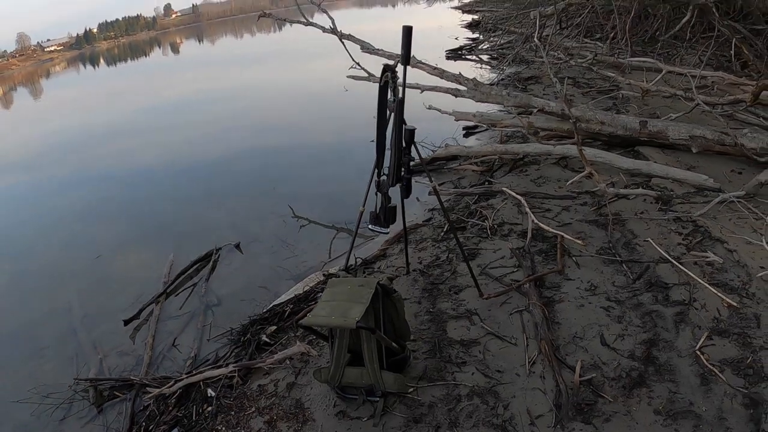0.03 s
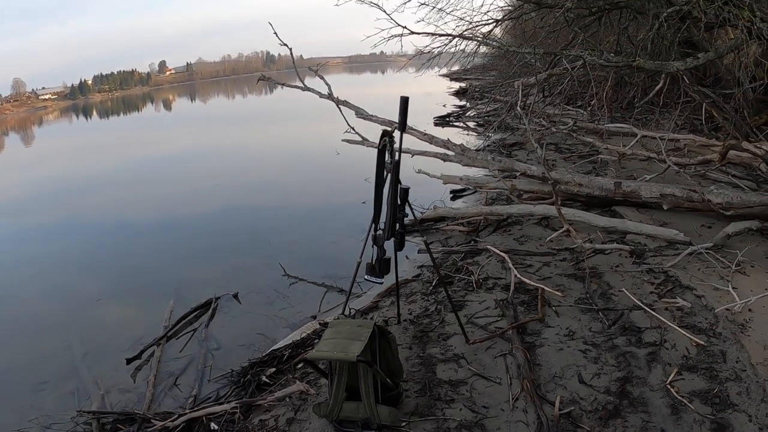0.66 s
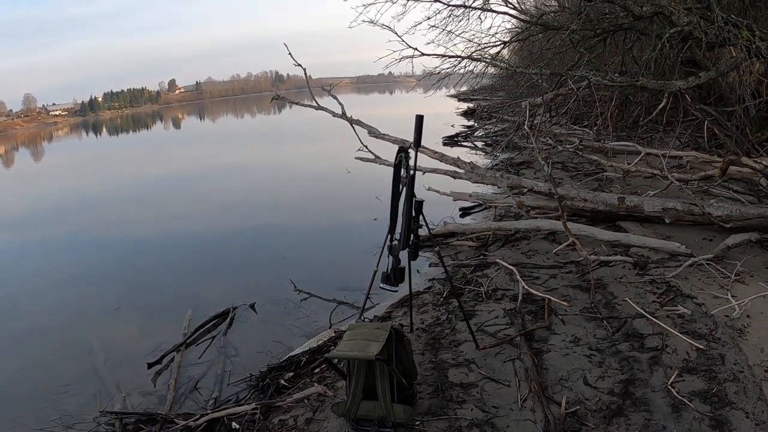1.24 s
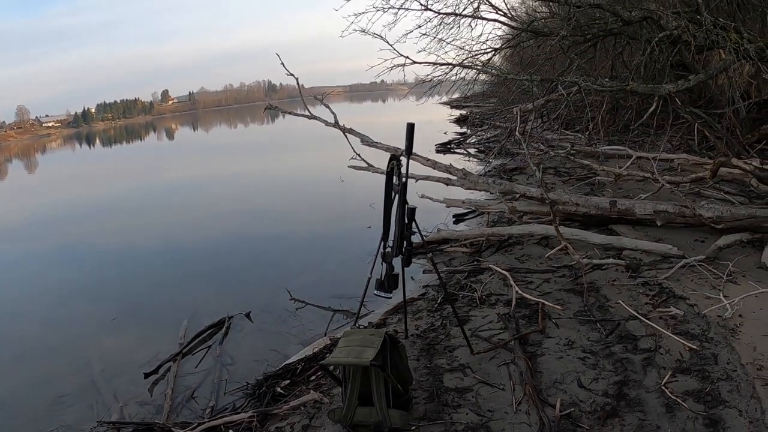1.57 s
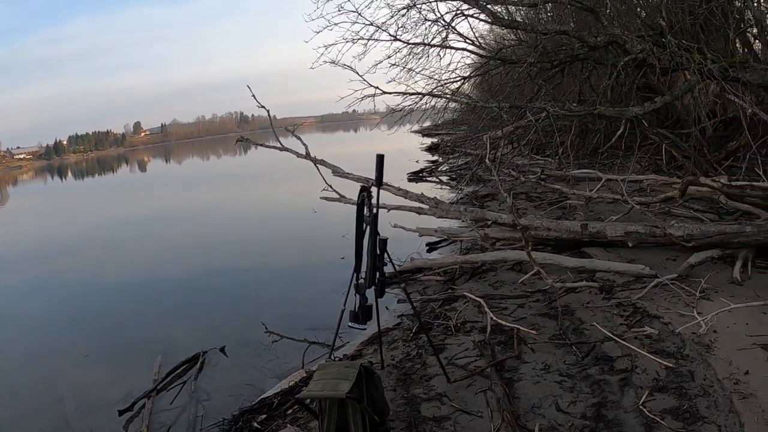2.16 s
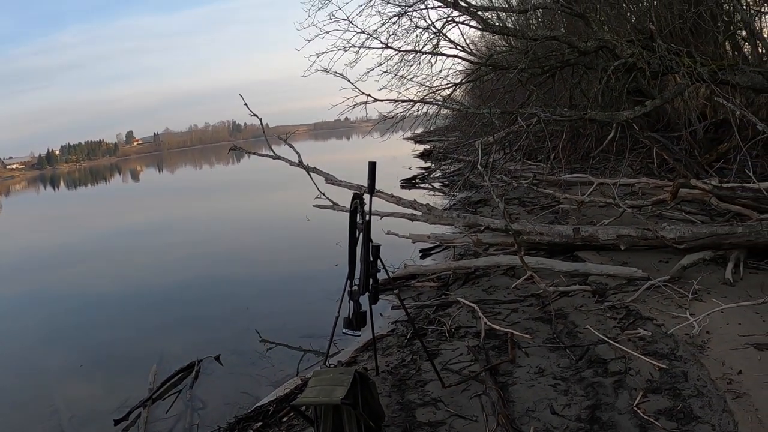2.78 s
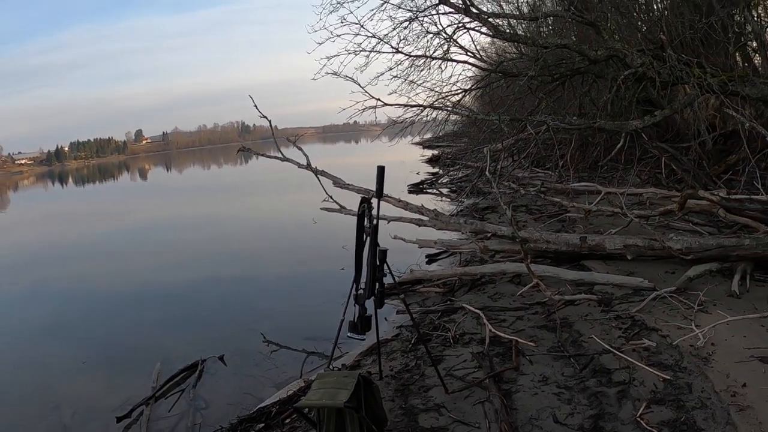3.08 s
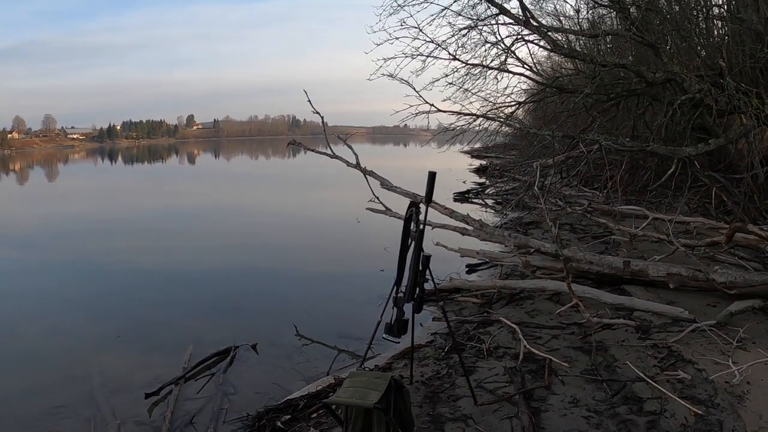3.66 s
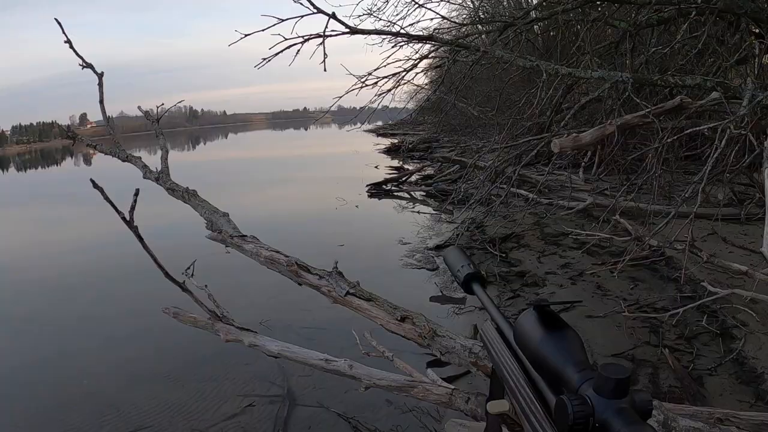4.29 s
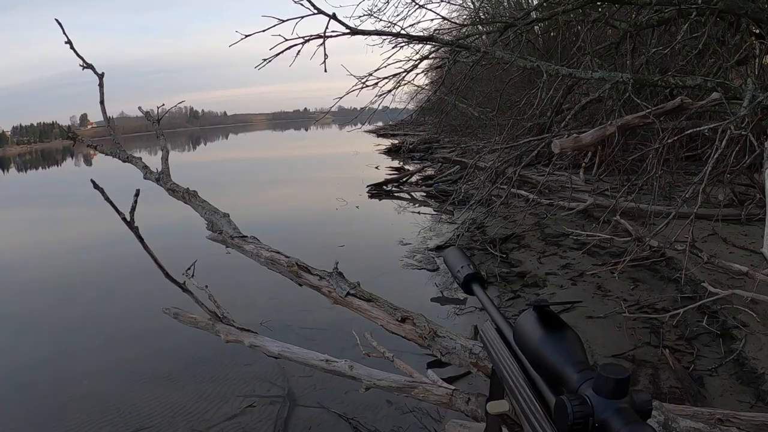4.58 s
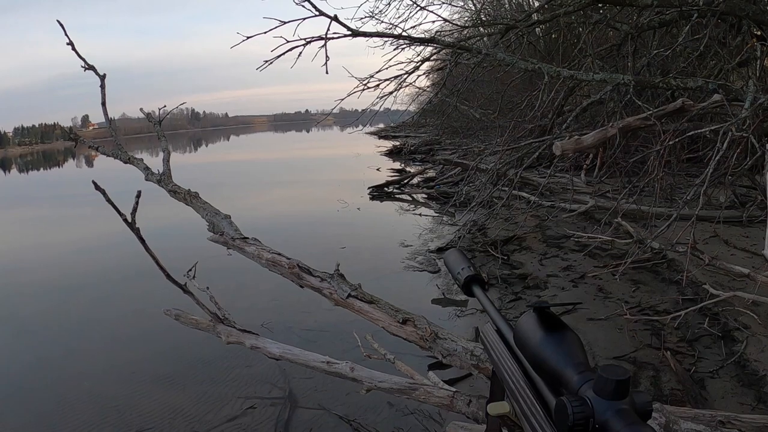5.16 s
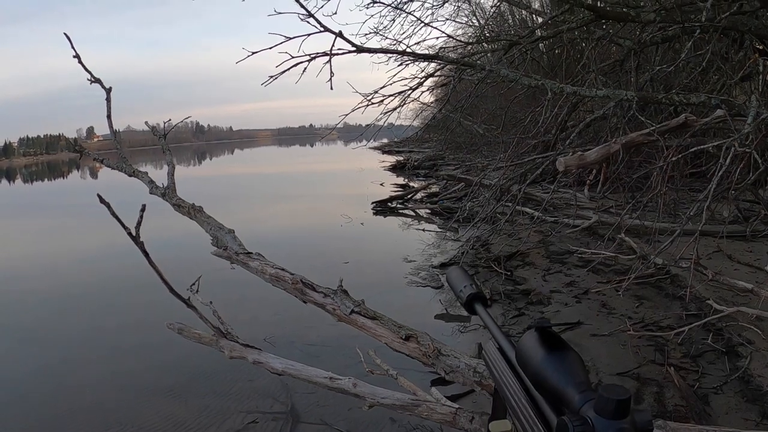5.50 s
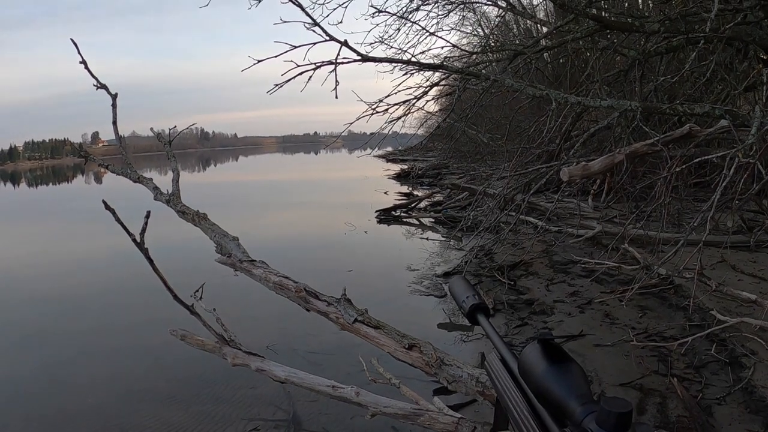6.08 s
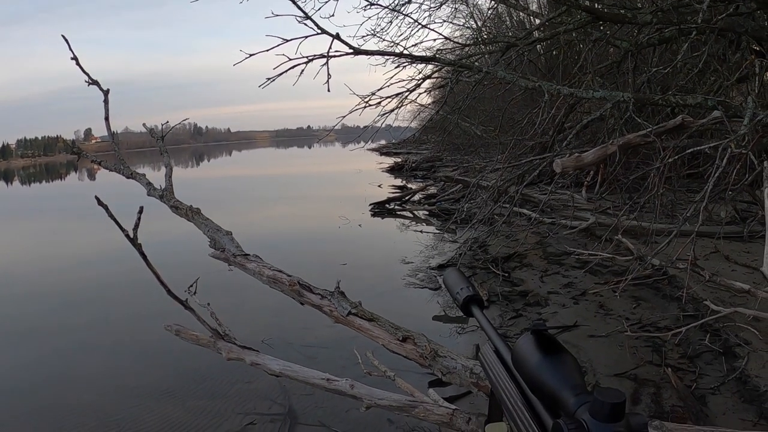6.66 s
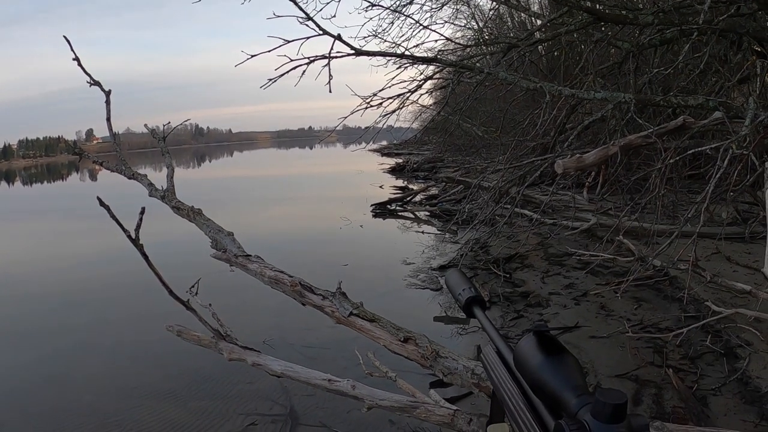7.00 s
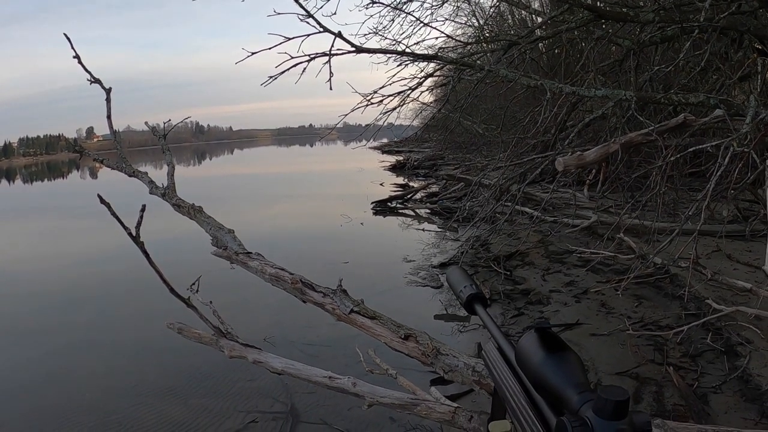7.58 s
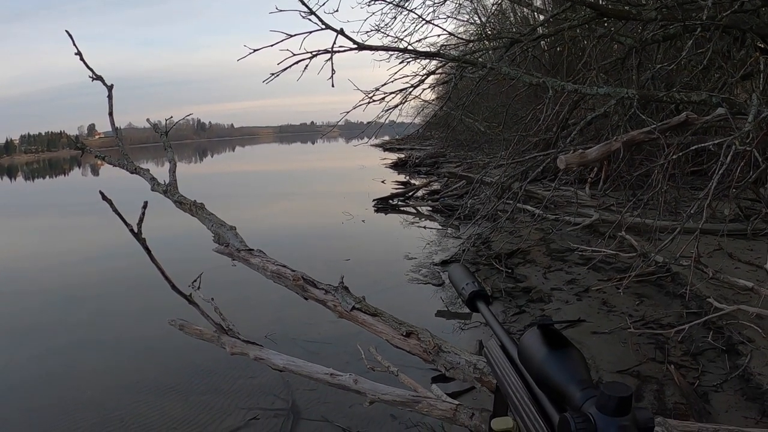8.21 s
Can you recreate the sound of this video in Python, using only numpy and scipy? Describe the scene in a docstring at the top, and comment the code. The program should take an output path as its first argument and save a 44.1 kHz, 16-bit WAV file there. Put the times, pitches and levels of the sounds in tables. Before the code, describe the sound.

Beside still water, a crow caws harshly every second or few, and each call rings on in the woods. Underneath, wind thumps the microphone briefly, then settles into a low rumble that slowly eases. Scattered little twig snaps sound close by. Between the caws come faint rising whistles and high buzzy notes from two distant small birds, with a dull outdoor murmur behind it all.

```python
"""A crow caws over the low rumble of wind on the microphone, by a still river bank.
Quick snaps of its voice box ring its throat and beak, and each rasping call echoes on in the woods.
A dull murmur and a faint hiss lie underneath; twigs tick nearby and the wind gives a few bumps.
Two small songbirds answer far off, one with rising whistles, one with thin buzzy notes."""
import sys
import numpy as np
from scipy import signal
from scipy.fft import rfft, irfft
from scipy.io import wavfile
from scipy.ndimage import uniform_filter1d

SR = 44100
rng = np.random.default_rng(int(sys.argv[2]) if len(sys.argv) > 2 else 0)


def store_pcm(level_fs):
    """Save levels as 16-bit WAV."""
    pcm = np.round(np.clip(level_fs, -1, 1) * 32767).astype(np.int16)
    wavfile.write(sys.argv[1], SR, np.atleast_2d(pcm).T)


N = 367794
T = np.arange(N) / SR


def undb(db):
    """Turn decibels into a gain."""
    return 10 ** (np.asarray(db) / 20)


def unit(x):
    """Scale to an average power of 1."""
    return x / np.sqrt(np.mean(x ** 2))


def at_hz(points, hz):
    """Read between (Hz, value) points on a log-frequency axis."""
    f, value = np.transpose(points)
    return np.interp(np.log(np.maximum(hz, 1)), np.log(f), value)


def colour(x, points):
    """Filter by a (Hz, dB) curve."""
    n = x.shape[-1]
    return irfft(rfft(x) * undb(at_hz(points, np.fft.rfftfreq(n, 1 / SR))), n)


def resonate(x, hz, width_hz, db):
    """Make x ring at one pitch; filtering twice gives the peak steep sides."""
    b, a = signal.iirpeak(hz, hz / (1.114 * width_hz), SR)
    return undb(db) * signal.lfilter(b, a, signal.lfilter(b, a, x))


def add(out, x, start):
    """Mix x into out at a start time in seconds."""
    i = int(start * SR)
    x = x[..., max(-i, 0):N - i]
    out[..., max(i, 0):max(i, 0) + x.shape[-1]] += x


def stereo_noise(points, side_db):
    """Noise shaped by a (Hz, dB) curve; more side_db makes it wider."""
    mid, side = colour(rng.standard_normal((2, N)), points) * np.sqrt(SR / 2)
    return mid + undb(side_db) * side * np.array([[1], [-1]])


def wander(per_second):
    """A smooth random curve of size about 1."""
    hold = int(SR / per_second)
    steps = rng.standard_normal(SR // 100)[np.arange(N) // hold]
    return unit(uniform_filter1d(uniform_filter1d(steps, hold), hold))


def caw(length, throat_hz, beak_hz, harsh_db, chest_db):
    """The voice box snaps about sixty times a second; each snap rings the throat and puffs air."""
    # Resonances. Each row: pitch in Hz, width in Hz, gain in dB.
    chest = (495, 85, 0)
    sharp_edge = (2410, 460, -22.5)
    overtones = [(1065, 47, -12.5), (1200, 33, -18), (1460, 80, -22), (1700, 140, -12)]
    hoarse_breath = [(1126, 380, -2.5), (1392, 205, -13.5), (2380, 2300, -30)]
    # Treble lost on the long way through the air. Each row: frequency in Hz, gain in dB.
    air_loss = [(1500, 3.5), (2100, -1), (3000, -4.5), (4200, -1.5), (7000, -35)]
    rasp_hz, arch, jitter, puff_s = 64.18, 0.07997, 0.0076, 0.0092
    t = T[:SR // 3]
    progress = np.clip(t / length, 0, 1)
    # Effort swells slowly and drops quickly; the snap rate rises and falls with it.
    effort = np.maximum(np.sin(np.pi * progress ** 1.2), 0) ** .85
    cycles = np.cumsum(rasp_hz * (1 - arch * (2 * progress - 1.15) ** 2 + arch / 20)) / SR
    snap_at = np.flatnonzero(np.diff(np.floor(cycles)))
    early, size_db = rng.standard_normal((SR // 1000, 2))[:len(snap_at)].T
    snap_at -= (jitter * SR / rasp_hz * early).astype(int)
    snaps = np.zeros(len(t))
    snaps[np.clip(snap_at, 0, len(t) - 1)] = undb(size_db)
    since_snap = (cycles % 1) / rasp_hz
    puffs = np.exp(-since_snap / puff_s) * rng.standard_normal(len(t)) / np.sqrt(SR * puff_s / 2)
    # A harsher caw lifts the sharp edge and the beak over the throat.
    posture = [(*chest[:2], chest[2] + chest_db), (throat_hz, 144, 0),
               (*sharp_edge[:2], sharp_edge[2] + harsh_db)]
    voice = sum(resonate(effort * snaps, *ring) for ring in posture + list(overtones))
    beak_opening = undb(9.5 * (.5 - progress))  # the beak closes, so its ring fades
    voice += resonate(beak_opening * effort * snaps, beak_hz, width_hz=134, db=harsh_db - 3)
    voice += sum(resonate(effort * puffs, *ring) for ring in hoarse_breath)
    return unit(colour(voice, air_loss)) * np.sqrt(length / t[-1])


def crow():
    """Six caws ring through the trees; the row at 5.27 s is the soft, throaty echo of the fifth."""
    # Each row: start and length in seconds, level in dB, throat and beak pitch in Hz,
    # then harshness, chest and woods echo in relative dB.
    caws_and_echo = [(-.14, .22, -39, 1084, 1480, -3, -5, -0.5),
                     (1.226, .195, -35.5, 1075, 1305, 2, -2, -2),
                     (2.778, 0.1913, -35.5, 1056, 1324, -1.5, -4.5, -4.5),
                     (4.25, .15, -37, 1034, 1350, 1.5, 1, -2.5), (5.155, 0.183, -40, 985, 1434, 7, 1.5, -6),
                     (5.27, .26, -42.5, 1052, 1440, -19, -10, -7.5),
                     (7.849, 0.17, -45, 1007, 1376, 0.5, 2, 2)]
    out = np.zeros((2, N))
    for start, length, db, *voice, echo_db in caws_and_echo:
        sound = undb(db) * caw(length, *voice)
        add(out, outdoors(sound, direct_db=-3, echo_db=echo_db + 2, scatter_s=0.016), start)
    return out


def woods_echo(build_s=0.0032):
    """Countless trunks send sound back: it builds up, then each band dies at its own rate."""
    # The echo's tone. Each row: frequency in Hz, gain in dB.
    echo_tone = [(300, -3), (500, -4), (750, 1.5), (1050, 2.5), (1400, -1.5), (2000, 7), (3000, 5.5),
                 (5000, 0)]
    # Each row: frequency in Hz, seconds the echo takes to fade by 60 dB.
    fade_times = [(300, 2.8), (600, 3.8), (1050, 2.99), (1500, 3.27), (3000, 2.3), (5000, 1.5)]
    t = T[:int(2.5 * SR)]
    hz = np.fft.rfftfreq(len(t), 1 / SR)
    noise = rfft(rng.standard_normal((2, len(t))))
    band_hz, fades_s = np.transpose(fade_times)
    tail = 0
    for share, fade_s in zip(np.eye(len(band_hz)), fades_s):
        band = at_hz(np.c_[band_hz, share], hz)
        tail += irfft(noise * band, len(t)) * np.exp(-np.log(1000) * t / fade_s)
    return colour(tail, echo_tone) * (1 - np.exp(-t / build_s)) / np.sqrt(SR / 10)


def outdoors(x, direct_db, echo_db, scatter_s):
    """A call arrives directly, scattered by branches round the bird, and as a long echo."""
    # What thin branches scatter. Each row: frequency in Hz, gain in dB.
    branch_tone = [(450, 5), (1000, -2.5), (1600, -1), (4000, 1.5)]
    response = undb(echo_db) * woods_echo()
    t = T[:response.shape[1]]
    branches = colour(rng.standard_normal(response.shape), branch_tone)
    response += branches * np.exp(-t / scatter_s) / np.sqrt(SR * scatter_s / 2)
    response[:, 0] += undb(direct_db)
    return signal.fftconvolve(x[None], response, axes=1) / np.sqrt(1 + undb(2 * direct_db))


def wind(start_db=-33.5, ease_db_per_s=0.51, flutter_db=2.5):
    """Swirls of air rumble on the microphone and slowly ease; a few bump its left side harder."""
    # The rumble's tone. Each row: frequency in Hz, relative level in dB.
    rumble_tone = [(8, -38.5), (18, -12.5), (26, -11), (36, -14.5), (52, -25), (70, -21), (100, -31),
                   (130, -40.5), (170, -45.5), (300, -59.5), (800, -96)]
    # Each row: time in seconds, pitch in Hz, width in seconds, peak on the left in dB.
    bumps = [(0.246, 32, 0.022, -15.5), (0.266, 93, 0.0028, -9), (0.322, 59, 0.0039, -10.5)]
    out = stereo_noise(rumble_tone, side_db=-5)
    level_db = start_db - ease_db_per_s * T + flutter_db * wander(per_second=4.3)
    out *= undb(level_db + np.array([[.5], [-.5]]))
    for time, hz, width_s, db in bumps:
        from_peak = np.minimum(np.abs(T - time) / width_s * 2, 20)
        bump = np.cos(2 * np.pi * hz * (T - time)) / np.cosh(from_peak)
        out += undb(db + np.array([[0], [-13]])) * bump
    return out


def background():
    """The far landscape murmurs and the microphone hisses; both slowly fade."""
    # Their tones. Each row: frequency in Hz, relative level in dB.
    murmur_tone = [(60, -59), (170, -76.5), (260, -77.5), (400, -81), (600, -86), (1000, -92), (1800, -105),
                   (3500, -114), (8000, -130)]
    hiss_tone = [(200, -108), (2500, -106), (5000, -106), (8000, -106), (12000, -104.5), (15500, -102)]
    murmur = stereo_noise(murmur_tone, side_db=-7) * undb(5.5 - 0.52 * T)
    hiss = stereo_noise(hiss_tone, side_db=0.5) * undb(0.68 - 0.35 * T)
    return murmur + hiss


def twigs(rise_s=0.0003, decay_s=0.0071, rustle_db=-14, rustle_s=0.27):
    """Small dry snaps, each with a woody ring and a short rustle after it."""
    # Each row: start in seconds, relative peak in dB, gain of the low woody body in dB.
    ticks = [(.157, -39.5, 3), (1.1112, -43, 22), (1.2625, -34, 25), (2.5631, -41.5, -5), (4.176, -41, 17),
             (4.848, -40.5, 23), (5.011, -48.5, 11), (5.883, -43, 25), (6.3047, -52, 17), (6.6268, -54, 4),
             (7.414, -49.5, 16), (7.76, -49, 4)]
    # A snap's tone. Each row: frequency in Hz, gain in dB.
    snap_tone = [(400, -41), (1000, -11), (1700, 14.5), (2700, 7), (4000, -1.5), (7000, -20), (14000, -40)]
    out, t = np.zeros((2, N)), T[:SR // 4]
    shape = (1 - np.exp(-t / rise_s)) * (np.exp(-t / decay_s) + undb(rustle_db) * np.exp(-t / rustle_s))
    for start, db, body_db in ticks:
        burst = rng.standard_normal((2, len(t))) * shape
        ring = resonate(burst, hz=1710, width_hz=670, db=0)
        body = resonate(burst, hz=860, width_hz=550, db=body_db)
        tick = colour(burst, snap_tone) + ring + body
        add(out, undb(db) * 2 * tick / np.abs(tick).max(), start)
    return out


def song(notes, buzz_hz, waver_hz, lateness):
    """Pure tones glide with a fast, uneven flutter in pitch; more lateness makes them peak later."""
    out = np.zeros(N)
    for start, length, start_hz, end_hz, db, depth_hz in notes:
        t = T[:int(length * SR)]
        glide = start_hz + (end_hz - start_hz) * t / length
        buzz = depth_hz * np.sin(2 * np.pi * buzz_hz * t)
        waver = waver_hz * unit(uniform_filter1d(rng.standard_normal(SR // 4), size=120))[:len(t)]
        tone = np.sin(2 * np.pi * np.cumsum(glide + buzz + waver) / SR)
        swell = np.sqrt(np.sin(np.pi * (t / length) ** lateness))
        add(out, undb(db) * unit(swell * tone), start)
    return out


def whistling_bird(foot_hz=2434, warm_up_notes=2.05, slowing_s=.009):
    """Runs of seven rising whistles grow longer, higher and slower as the bird warms up."""
    # Each row: start, base note spacing and full note length in seconds, full top pitch in Hz,
    # level in dB, dB taken off the first note.
    phrases = [(1.611, .147, .125, 3457, -64.5, -2), (7.149, .152, 0.12, 3663, -64, 3.5)]
    notes = []
    for start, spacing, length, top_hz, db, softer_db in phrases:
        for k, chance in enumerate(rng.standard_normal(7)):
            cold = np.exp(-(k / warm_up_notes) ** 2)
            end_hz = top_hz - 479 * cold + 42.3 * chance
            notes.append((start, length - 0.039 * cold, foot_hz, end_hz, db - cold * softer_db, 22))
            start += spacing + (k + .5) * slowing_s
    whistles = song(notes, buzz_hz=70.1, waver_hz=47.6, lateness=1.24)
    return outdoors(whistles, direct_db=-4.5, echo_db=-3, scatter_s=0.01)[:, :N]


def buzzing_bird():
    """A bird deep in the bushes gives thin notes whose pitch shakes fast enough to buzz."""
    # Each row: start and length in seconds, first pitch and glide in Hz, level in dB, buzz depth in Hz.
    thin_notes = [(2.402, 0.092, 4630, 39, -54, 49), (2.585, .08, 4500, -17, -51.5, 42),
                  (2.76, 0.091, 4420, -32, -58.5, 50), (3.27, 0.24, 2517, 600, -67, 140),
                  (3.94, .15, 4600, -100, -71.5, 260), (4.171, 0.036, 3320, -150, -62.5, 170),
                  (5.57, 0.092, 4440, 140, -69, 76), (5.785, 0.068, 4440, 80, -67.5, 80),
                  (6.939, .17, 2454, 16, -74, 20)]
    notes = [(start, length, hz, hz + glide_hz, db, depth_hz)
             for start, length, hz, glide_hz, db, depth_hz in thin_notes]
    buzzes = song(notes, buzz_hz=87, waver_hz=36, lateness=0.92)
    return outdoors(buzzes, direct_db=-5.5, echo_db=-9, scatter_s=0.031)[:, :N]


def scene():
    """Three birds and the twigs, over wind and background."""
    return crow() + whistling_bird() + buzzing_bird() + twigs() + wind() + background()


def record(dry):
    """The recorder cuts the treble above 15800 Hz."""
    return signal.sosfilt(signal.ellip(12, .1, 80, 15800, fs=SR, output="sos"), dry)


dry = scene()
out = record(dry)
store_pcm(out)
```